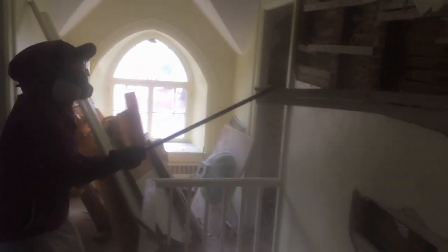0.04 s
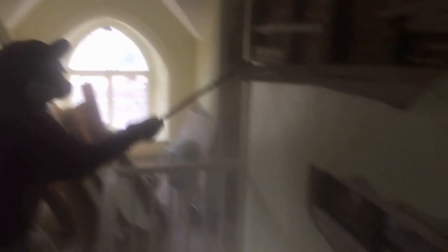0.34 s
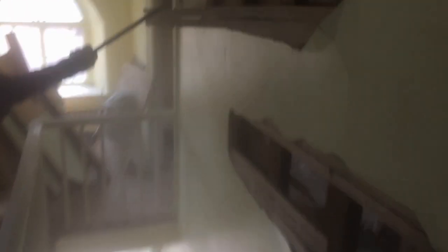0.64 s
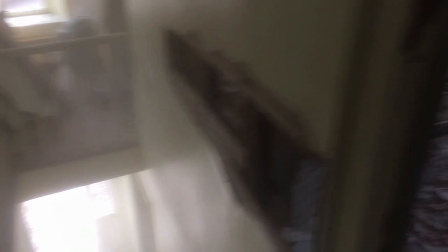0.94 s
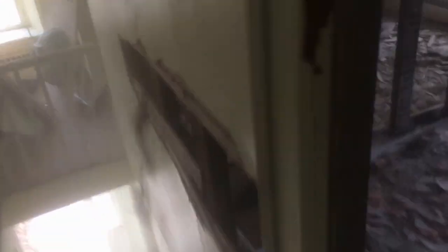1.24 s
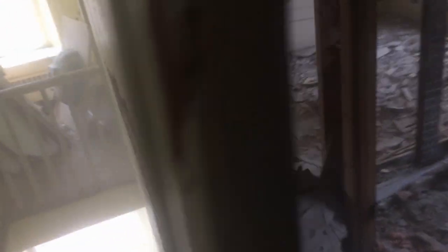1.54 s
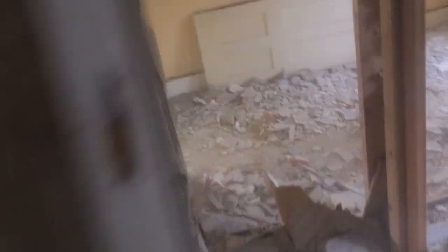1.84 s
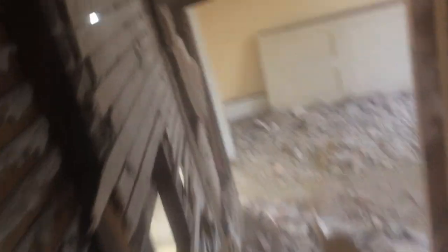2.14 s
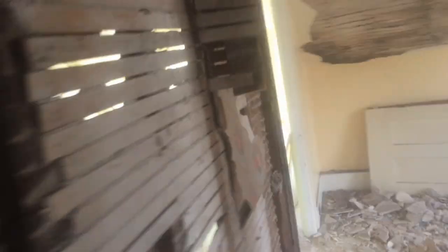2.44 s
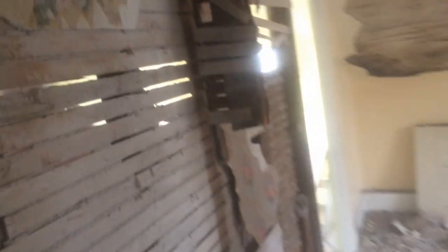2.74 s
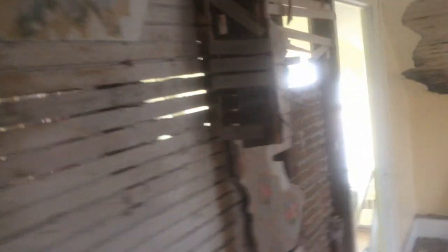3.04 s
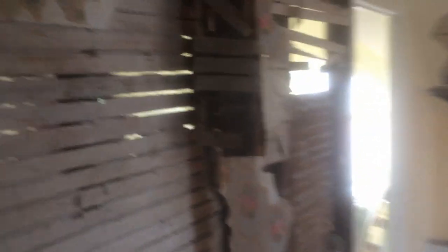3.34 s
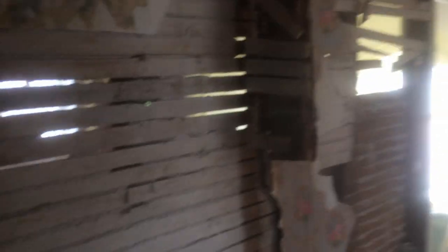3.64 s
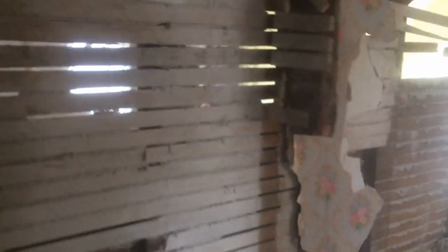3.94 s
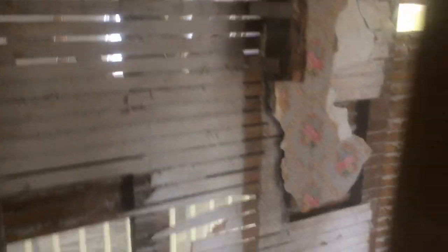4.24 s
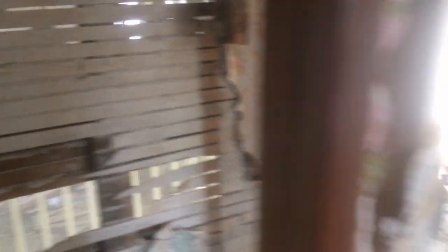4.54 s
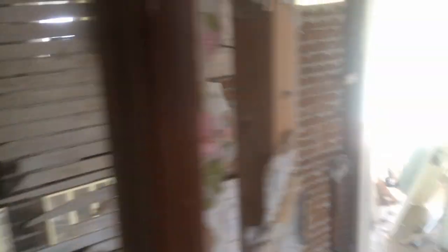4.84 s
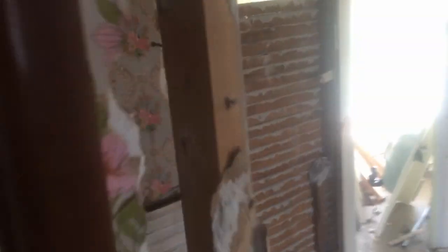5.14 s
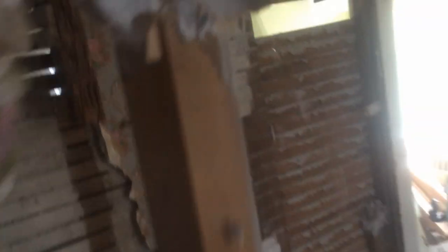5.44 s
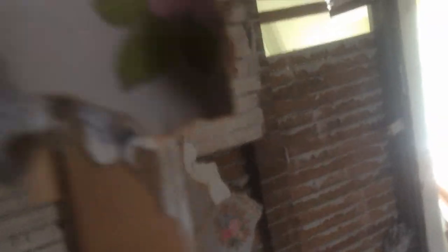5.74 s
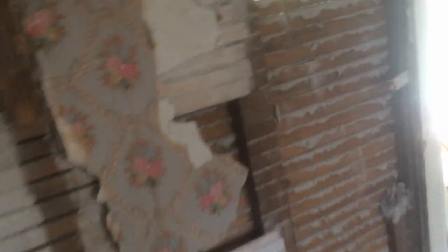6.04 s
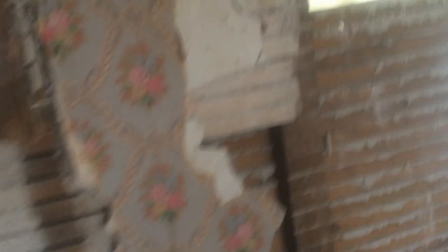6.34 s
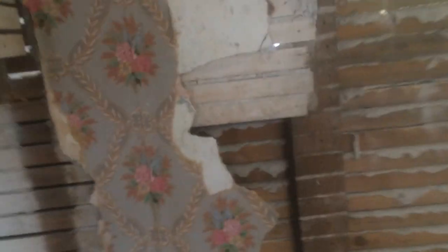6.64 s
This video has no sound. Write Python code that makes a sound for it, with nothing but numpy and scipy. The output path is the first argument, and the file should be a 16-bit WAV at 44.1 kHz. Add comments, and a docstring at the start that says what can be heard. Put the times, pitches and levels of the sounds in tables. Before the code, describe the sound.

From the start, old plaster snaps and crumbles off a wall in a dense run of cracks, with fine grit pouring close by. A steel pry bar clangs briefly, clearest at 0.4 seconds. Loose wooden strips clack and heavy pieces thud on hollow floorboards, strongly around 0.3 and 1.5 seconds. A dry lath snaps near 2 seconds, then the activity thins to boot thuds and shifting rubble. Another slab crunches with a low thump at 3.1 seconds. Small chips tick and snap nearby, wood knocks lightly, and a loose nail pings at about 3.6 seconds. A sharp crack and knock come at 4.7 seconds. From 5 to 6.3 seconds it is much quieter, with faint boot scuffs and a few chips. Around 6.6 seconds a scuff, a floor thud and more crumbling plaster close the sequence. The bare rooms ring briefly over faint low air.

```python
"""Prying off plaster and lath

Old plaster and wooden lath come off a wall in a gutted house. Slabs snap and crumble in runs of
small cracks; the steel bar, falling strips and a loose nail ring in damped modes. Boots thud on
hollow floorboards and stir the rubble. Chips tick close by; the bare rooms ring briefly."""
import sys
import numpy as np
from scipy import signal
from scipy.fft import rfft, irfft
from scipy.io import wavfile
from scipy.ndimage import uniform_filter1d

SR = 44100
rng = np.random.default_rng(int(sys.argv[2]) if len(sys.argv) > 2 else 0)


def put_to_file(sound):
    """Save the sound as 16-bit audio at rate SR, in the file named by the first command-line argument."""
    columns = np.atleast_2d(sound).T  # one column per channel
    safe = np.clip(columns, -1, 1)
    whole_steps = np.round(safe * 32767)
    wavfile.write(sys.argv[1], SR, whole_steps.astype(np.int16))


N = 298998


def from_db(db):
    return 10 ** (np.asarray(db) / 20)


def unit_rms(x):
    return x / np.sqrt(np.mean(x ** 2) + 1e-20)


def seconds(length_s):
    return np.arange(int(length_s * SR)) / SR


def decay(t, t60_s):
    return np.exp(-np.log(1000) * t / np.maximum(t60_s, 1e-3))


def at_hz(points, hz):
    """Interpolate a table over log frequency."""
    known_hz, values = np.transpose(points)
    return np.interp(np.log(np.maximum(hz, 1)), np.log(known_hz), values)


def coloured(x, spectrum):
    """Apply a gain curve; rms 1."""
    gain = from_db(at_hz(spectrum, np.fft.rfftfreq(N, 1 / SR)))
    return unit_rms(irfft(rfft(x) * gain, N))


def band(x, low_hz, high_hz, order=3):
    sos = signal.butter(order, [low_hz, high_hz], "band", fs=SR, output="sos")
    return signal.sosfilt(sos, x + 1e-18)


def add(out, start_s, sound):
    at = int(start_s * SR)
    out[at:at + len(sound)] += sound[:N - at]


def at_onset_level(level_db, sound, t60_s, onset_s):
    """Scale a decaying sound to about level_db rms over its first onset_s."""
    energy_share = 1 - decay(onset_s, t60_s) ** 2
    unit_energy = sound / (np.linalg.norm(sound) + 1e-9)
    return from_db(level_db) * unit_energy * np.sqrt(onset_s * SR / energy_share)


def grains(samples, per_s, spread_db):
    """Random clicks of either sign, sizes spread exponentially in dB."""
    birth, size, sign = rng.random((3, samples))
    size_db = spread_db * np.minimum(-np.log(1 - size), 4)
    return (birth < per_s / SR) * from_db(size_db) * np.sign(sign - .5)


def fragment(ring_s, ring_db, count=64):
    """An irregular piece: sharp contact, then damped modes, the high ones dying first."""
    t = seconds(.03)
    detune, sign = rng.random((2, count, 1)) - .5
    hz = np.geomspace(280, 14000, count)[:, None] * 2 ** (detune / 10)
    strength = np.sign(sign) * hz / np.hypot(hz, 3000)   # brief contact drives low modes weakly
    t60_s = ring_s * np.sqrt(1000 / hz)
    modes = (strength * np.sin(2 * np.pi * hz * t) * decay(t, t60_s)).sum(axis=0)
    response = from_db(ring_db) * modes / np.linalg.norm(modes)
    response[0] += 1
    return response


def struck(modes, blows, uneven_db):
    """Each blow rings the same modes at random strengths."""
    out, t = np.zeros(N), seconds(.7)
    rings = np.array([from_db(db) * np.sin(2 * np.pi * hz * t) * decay(t, t60_s)
                      for hz, db, t60_s in modes])
    for start_s, level_db in blows:
        strengths = from_db(level_db + uneven_db * rng.standard_normal(len(modes)))
        signs = rng.choice([-1, 1], len(modes))
        add(out, start_s, (strengths * signs) @ rings)
    return out


def swell_power(swells):
    """Power of brief movements that rise fast and ebb slowly."""
    t = np.arange(N) / SR
    return sum((from_db(level_db) * np.interp((t - start_s) / length_s, [0, .2, 1], [0, 1, 0])) ** 2
               for start_s, level_db, length_s in swells)


def trickle(spectrum, per_s, spread_db, ring_s, dust_db, shapes=10):
    """Pieces tumble at random over a hiss of sliding dust; rms 1."""
    pieces = np.zeros(N)
    for _ in range(shapes):
        contacts = grains(N, per_s / shapes, spread_db)
        pieces += signal.oaconvolve(contacts, fragment(ring_s, ring_db=4))[:N]
    dust = from_db(dust_db) * rng.standard_normal(N)
    return coloured(unit_rms(pieces) + dust, spectrum)


# background spectrum: freq_hz, gain_db
AIR_SPECTRUM = [(20, -19.5), (50, 0.5), (180, -10.5), (400, -13), (1000, -16.5), (4000, -21.5),
                (16000, -32.5)]


def room_air():
    """Faint, steady, bass-heavy noise."""
    return coloured(rng.standard_normal(N), AIR_SPECTRUM)


# loose rubble on the move: time_s, level_db
SETTLING = [(0.0, -28), (0.32, -30), (0.51, -32.5), (0.7, -34), (0.91, -29), (1.4, -36), (1.64, -28),
            (2.02, -42), (2.45, -40), (2.62, -49), (3.87, -48), (3.98, -40.5), (4.63, -43.5), (4.87, -54.5),
            (5.38, -65.5), (5.65, -59.5), (6.34, -65.5), (6.78, -35)]
# shuffling boots: start_s, level_db, length_s
BOOT_SCUFFS = [(2.429, -36.5, .24), (4.08, -37, 0.2), (4.372, -40.5, 0.18), (5.074, -44.5, 0.42),
               (5.317, -44, 0.35), (6.321, -42, 0.17), (6.553, -33, 0.36)]


def rubble_motion_db(scuff_boost_db=0, usual_db=-40):
    """Slow settling plus a swell per boot scuff, relative to the usual motion."""
    settling_db = np.interp(np.arange(N) / SR, *np.transpose(SETTLING))
    power = from_db(settling_db) ** 2 + from_db(scuff_boost_db) ** 2 * swell_power(BOOT_SCUFFS)
    return 10 * np.log10(power) - usual_db


# spectra of coarse lumps, fine grit and floor rumble: freq_hz, gain_db
LUMP_SPECTRUM = [(120, -21), (400, -4.5), (800, 2.5), (1500, -3), (2800, -4), (4500, -10.5), (8000, -12),
                 (16000, -48.5)]
GRIT_SPECTRUM = [(1500, -31), (3500, -7.5), (5500, -0.5), (8000, -9), (11000, -8), (16000, -18.5)]
RUMBLE_SPECTRUM = [(20, -44.5), (40, -12), (65, 0.5), (100, -4), (170, 8.5), (250, 2), (350, 2), (500, 1),
                   (1000, -27.5)]
# fine plaster pouring close by: start_s, level_db, length_s
PLASTER_SHOWERS = [(.09, -34.5, 0.15), (.3, -32, 0.15), (.97, -37, 0.19), (1.5, -46, 0.19),
                   (1.7, -43, 0.078), (4.58, -43.5, 0.083), (5.07, -47, 0.24), (5.39, -46, .09)]


def shifting_rubble(surge_db=2.5, surge_s=.027):
    """One motion tumbles lumps, trickles grit and rumbles the floor; showers add more grit."""
    width = int(surge_s * SR)
    surges = unit_rms(uniform_filter1d(uniform_filter1d(rng.standard_normal(N), width), width))
    motion_db = rubble_motion_db() + surge_db * surges
    lumps = trickle(LUMP_SPECTRUM, per_s=500, spread_db=.5, ring_s=.085, dust_db=-7)
    grit = trickle(GRIT_SPECTRUM, per_s=370, spread_db=3, ring_s=.009, dust_db=0)
    grit_db = -56 + .72 * rubble_motion_db(scuff_boost_db=2)   # boots crush extra grit
    grit_gain = np.sqrt(from_db(grit_db) ** 2 + swell_power(PLASTER_SHOWERS))
    rumble = coloured(rng.standard_normal(N), RUMBLE_SPECTRUM)
    return from_db(-44 + motion_db) * lumps + grit_gain * grit + from_db(-45.5 + .9 * motion_db) * rumble


# body, knock, crack and grit bands: low_hz, high_hz
FRACTURE_BANDS = [(250, 650), (650, 1500), (1500, 4200), (4200, 13000)]


def band_levels_db(level_db, register_oct, focus_db_per_oct):
    """A piece is loudest in the band nearest its register, counted up from the knock band."""
    centres_oct = np.log2(FRACTURE_BANDS).mean(axis=1)
    distance_oct = np.abs(centres_oct - centres_oct[1] - register_oct)
    return level_db - focus_db_per_oct * (distance_oct - distance_oct.min())


def fractures(pieces, cracks_per_s, spread_db, snap_db, ring_s, ring_db, dull_hz, linger=1, splinters=3):
    """Each piece gives way with one snap and a dying run of cracks shared among its splinters."""
    out, t = np.zeros(N), seconds(.25)
    pole = np.exp(-2 * np.pi * dull_hz / SR)   # soft material dulls each contact
    for start_s, level_db, register_oct, focus_db_per_oct, crumble_s in pieces:
        t60_s = linger * crumble_s
        runs = np.array([grains(len(t), cracks_per_s / splinters, spread_db) for _ in range(splinters)])
        runs *= decay(t, t60_s)
        runs /= np.linalg.norm(runs) + 1e-9
        runs[0, 0] += from_db(snap_db) * decay(crumble_s, .98)   # slower crumbling, weaker snap
        cracks = sum(signal.fftconvolve(run, fragment(ring_s, ring_db))[:len(t)] for run in runs)
        dulled = signal.lfilter([1], [1, -pole], cracks)
        levels_db = band_levels_db(level_db, register_oct, focus_db_per_oct)
        for band_db, edges_hz in zip(levels_db, FRACTURE_BANDS):
            add(out, start_s, at_onset_level(band_db, band(dulled, *edges_hz), t60_s, onset_s=.02))
    return out


# plaster and lath breaking or landing: start_s, level_db, register_oct, focus_db_per_oct, crumble_s
WALL_BREAKS = [(.017, -20.5, 1.1, 5, 0.076), (.095, -17, -0.27, 5, 0.055), (.14, -27.5, 1.4, 18, 0.038),
               (.19, -21, 0.073, 5.5, 0.32), (.228, -22, 0.09, 4.5, 0.069), (.294, -19.5, .1, 4, 0.1),
               (.301, -23, 2, 12, 0.016), (.322, -25, -0.25, 4.5, 0.48), (.401, -25, 0.55, 9, 0.032),
               (.418, -15.5, 1.89, 28, 0.043), (.434, -20, 1.73, 14, 0.15), (.673, -28.5, 0.83, 10.5, 0.14),
               (.722, -18, 1.09, 9, 0.13), (.755, -23.5, 0.84, 18, 0.14), (.832, -23.5, 0.55, 6, .079),
               (.851, -29.5, 1.1, 11, 0.055), (.911, -17, 1.77, 13.5, 0.066), (.964, -23, 1.62, 6, 0.13),
               (.995, -25, 1.5, 10.5, 0.26), (1.112, -20.5, 1.02, 6.5, 0.06), (1.15, -25.5, 0.74, 10, 0.04),
               (1.207, -15, -0.82, 9.5, 0.032), (1.283, -36.5, -2, 0.5, 0.049),
               (1.421, -23.5, 0.36, 7.5, 0.064), (1.452, -15, -1.5, 16, 0.077),
               (1.468, -18, -1.42, 4, 0.13), (1.471, -23, 1.58, 13, 0.093), (1.538, -19, 0.93, 8, 0.085),
               (1.568, -22.5, -0.86, 5.5, 0.12), (1.654, -28, -0.85, 4.5, 0.015),
               (1.733, -28.5, 1.67, 11, 0.18), (1.75, -27, -1.5, 12, 0.047), (1.78, -36.5, 0, 0.5, 0.059),
               (1.96, -27, 0.87, 11, 0.066), (2.096, -29, -1, 6.5, 0.016), (2.126, -30, 0.98, 22, 0.075),
               (2.208, -36, 1.4, 19, 0.032), (2.296, -33.5, 1.4, 4.5, 0.093), (2.52, -34, -0.5, 9, 0.22),
               (2.803, -42.5, 0.41, 17, 0.061), (2.88, -45.5, 0.82, 21, 0.19),
               (3.085, -19, 0.49, 7.5, 0.034), (3.094, -21.5, 1.35, 2.5, 0.18),
               (3.112, -19, -0.54, 3, 0.064), (4.018, -34.5, -0.13, 0.5, 0.079), (4.12, -38, 1.4, 7, 0.57),
               (4.485, -34.5, 1.95, 22, .2), (4.689, -19.5, 0.53, 7, 0.011), (4.703, -26, 1.8, 7, 0.11),
               (5.138, -46, 1.5, 5, 0.097), (5.228, -39, 0.51, 6, 0.069), (5.252, -39, 1.6, 13, .053),
               (6.335, -39.5, -0.77, 10.5, 0.09), (6.365, -46, .8, 6, 0.3),
               (6.595, -31.5, 1.45, 3.5, 0.092), (6.626, -33, -1.4, 9, 0.039),
               (6.669, -27, 1.85, 3.5, 0.19)]


def breaking_wall():
    """Plaster crunches broadly (low focus); wood cracks in a narrow range (high focus)."""
    return fractures(WALL_BREAKS, cracks_per_s=2400, spread_db=3, snap_db=-3,
                     ring_s=.048, ring_db=6.5, dull_hz=1620, linger=1.4)


# steel bar modes: freq_hz, level_db, t60_s
PRY_BAR_MODES = [(1820, -12.5, 0.22), (2120, -5.5, .22), (2550, -2.5, 0.35), (2780, -4, 0.28),
                 (3006, -4.5, 0.12), (3160, 0, .2), (3095, -2, 0.35), (3505, -2.5, 0.15), (3420, -4.5, .3),
                 (3975, -3, .24), (4070, -7, 0.14), (4220, 0.5, 0.24), (6100, -10.5, 0.28),
                 (7935, -15.5, .2)]
# blows on the bar: start_s, level_db
PRY_BAR_BLOWS = [(.018, -35), (0.421, -27.5), (.724, -40)]


def pry_bar():
    """Struck steel clangs in a cluster of high modes."""
    return struck(PRY_BAR_MODES, PRY_BAR_BLOWS, uneven_db=1.5)


# loose wood knocking: start_s, level_db, pitch_hz
WOOD_CLACKS = [(0.019, -13, 3120), (0.096, -14, 1100), (1.208, -13.5, 782), (1.209, -24, 1130),
               (1.451, -14, 344), (1.468, -10.5, 592), (1.539, -21, 2000), (1.593, -14, 1096),
               (1.889, -24, 657), (2.018, -26, 1845), (3.474, -22.5, 2740), (3.549, -28, 980),
               (3.788, -27.5, 550), (3.954, -24.5, 920), (4.066, -25.5, 920), (4.69, -21.5, 742),
               (5.252, -30, 3050), (6.627, -20.5, 360)]


def clacking_strips():
    """A loose strip sounds one bending mode; the higher, the sooner it dies."""
    out, t = np.zeros(N), seconds(.2)
    for start_s, level_db, pitch_hz in WOOD_CLACKS:
        t60_s = .048 * (1000 / pitch_hz) ** .22
        add(out, start_s, from_db(level_db) * np.sin(2 * np.pi * pitch_hz * t) * decay(t, t60_s))
    return out


# steps and heavy pieces on the floor: start_s, boards_db, pitch_hz, joists_db
FLOOR_THUDS = [(0.065, -26.5, 305, -39.5), (0.092, -25.5, 297, -54), (.298, -14.5, 202, -29),
               (0.322, -37, 211, -37), (.371, -24.5, 223, -38), (0.494, -26.5, 270, -44),
               (.718, -21, 231, -58), (0.767, -31.5, 228, -48), (.835, -21.5, 207, -47),
               (.925, -23, 242, -55), (1.112, -27.5, 282, -67), (1.206, -25.5, 316, -60),
               (1.448, -14, 277, -33), (1.491, -31, 243, -30), (1.591, -24, 175, -57),
               (1.654, -25, 180, -45), (1.747, -26.5, 230, -36.5), (1.888, -17, 189.6, -51),
               (2.093, -28.5, 264, -53), (2.152, -32, 212, -46), (2.299, -33.5, 189, -41),
               (2.379, -34, 197, -56), (2.509, -24, 206, -51), (2.549, -29.5, 188, -36.5),
               (2.807, -42.5, 180, -48), (3.104, -21, 168, -28.5), (3.181, -43, 176, -37),
               (4.016, -29.5, 236, -62), (4.033, -38, 205, -66.5), (4.69, -36, 231, -38.5),
               (4.925, -53, 235, -55.5), (5.083, -48, 203, -72), (6.622, -25, 265.7, -32.5),
               (6.677, -33, 192, -44), (6.755, -33, 205, -45)]


def floorboards(board_t60_s=.1, joist_t60_s=.24, punch_t60_s=.056, spread_oct=.55, count=9):
    """A soft blow punches one board and rings modes round its pitch; the joists boom below."""
    out, t = np.zeros(N), seconds(.35)
    attack = 1 - decay(t, .018)
    for start_s, boards_db, pitch_hz, joists_db in FLOOR_THUDS:
        detune = rng.random((count, 1)) - .5
        sign = rng.choice([-1, 1], (count, 1))
        offset_oct = spread_oct * (np.linspace(-1, 1, count)[:, None] + 2 * detune / count)
        modes = (sign * np.sin(2 * np.pi * pitch_hz * 2 ** offset_oct * t)).sum(axis=0)
        punch = unit_rms(np.sin(2 * np.pi * pitch_hz * t) * decay(t, punch_t60_s))
        boards = unit_rms(modes * attack * decay(t, board_t60_s)) + from_db(-4) * punch
        joists = band(rng.standard_normal(len(t)) * decay(t, joist_t60_s), 61, 110)
        add(out, start_s, at_onset_level(boards_db, boards, board_t60_s, onset_s=.04))
        add(out, start_s, at_onset_level(joists_db, joists, joist_t60_s, onset_s=.04))
    return out


# hard grains hitting close by: start_s, level_db, t60_s
GRAIN_TICKS = [(.302, -26, .012), (.911, -24, .015), (1.053, -7.5, 0.024), (1.709, -2.5, 0.024),
               (2.297, -33, .02), (3.094, -15, .016), (3.207, -12, 0.081), (3.349, -25, .012),
               (3.432, -35, .014), (3.474, -29, .011), (3.745, -8, 0.0095), (3.886, -9, 0.011),
               (3.937, -29, .008), (4.005, -9, .02), (4.27, -6, 0.051), (4.616, -8, 0.024),
               (4.629, -10.5, 0.08), (4.689, 1, 0.046), (5.139, -17, .016), (6.67, -22, .03)]


def ticking_grains(fizz_db=-12.5):
    """A hard grain gives one bright click and shatters in a brief fizz."""
    out, t = np.zeros(N), seconds(.08)
    for start_s, level_db, t60_s in GRAIN_TICKS:
        tick = from_db(fizz_db) * rng.standard_normal(len(t)) * decay(t, t60_s)
        tick[0] = 1
        add(out, start_s, from_db(level_db) * tick)
    return band(out, 4500, 14000, order=1)


# chips snapping close by: start_s, level_db, register_oct, focus_db_per_oct, crumble_s
CHIP_SNAPS = [(.544, -31.5, 1.7, 4.5, 0.043), (1.051, -25.5, 1.9, 12, 0.019), (1.592, -21, -0.04, 7, 0.016),
              (1.915, -28, -1.5, 2, 0.037), (3.328, -40.5, 0, 5, 0.012), (3.351, -33, 0.24, 4, .025),
              (3.432, -40.5, .3, 1.5, 0.05), (3.474, -32, 1.4, 4, 0.022), (3.548, -30.5, 0.7, 5, 0.023),
              (3.601, -38, 1, 1.5, 0.18), (3.745, -33.5, 0.5, 4, 0.058), (3.784, -25, 0.8, 7.5, 0.013),
              (3.793, -31, 0.1, 4.5, 0.075), (3.855, -37, 1.8, 8, 0.047), (3.903, -38, 1.5, 4, 0.031),
              (3.937, -37.5, 2.4, 14, 0.019), (3.951, -38, 1.5, 5.5, 0.0066), (4.005, -32, 1.6, 2.5, 0.076),
              (4.066, -31.5, 0, 5, 0.038), (4.199, -36.5, 1.4, 10, 0.0079), (4.435, -42, 2, 23, 0.054),
              (5.05, -53.5, 2, 3.5, .015), (5.877, -60.5, 2.4, 1, .01), (6.014, -48, 0.44, 21, 0.026),
              (6.088, -60.5, 1.8, 10, .009)]


def snapping_chips():
    """Small pieces break with sparser, brighter, shorter cracks than the wall."""
    return fractures(CHIP_SNAPS, cracks_per_s=1300, spread_db=-1, snap_db=-8.5,
                     ring_s=.016, ring_db=7, dull_hz=2165)


# dry lath modes: freq_hz, level_db, t60_s
DRY_LATH_MODES = [(1710, -13, 0.19), (2210, -3.5, 0.11), (2563, 7.5, 0.045), (3000, 8, 0.009),
                  (4560, 2, 0.012)]
# lath snaps: start_s, level_db
LATH_SNAPS = [(1.960, -18.5), (3.785, -29)]


def snapping_lath():
    """A dry strip rings briefly as it snaps."""
    return struck(DRY_LATH_MODES, LATH_SNAPS, uneven_db=1)


# nail modes: freq_hz, level_db, t60_s
LOOSE_NAIL_MODES = [(3510, -1, 0.042), (3270, -21, 0.18), (5970, -10, 0.049)]
# nail landing: start_s, level_db
NAIL_LANDING = [(3.649, -26.5)]


def falling_nail():
    """A loose nail pings once on landing."""
    return struck(LOOSE_NAIL_MODES, NAIL_LANDING, uneven_db=3)


# decay of the bare rooms: freq_hz, t60_s
ROOM_DECAY = [(100, 0.4), (400, 0.26), (1200, 0.21), (3000, 0.21), (7000, 0.19), (15000, 0.14)]


def room_echo(x, build_s=.057):
    """Bare walls return a diffuse tail, the treble dying first."""
    t, edges_hz = seconds(.8), np.geomspace(50, 18000, 10)
    tail = np.zeros(len(t))
    for low_hz, high_hz in zip(edges_hz, edges_hz[1:]):
        t60_s = at_hz(ROOM_DECAY, np.sqrt(low_hz * high_hz))
        tail += band(rng.standard_normal(len(t)), low_hz, high_hz) * decay(t, t60_s)
    tail *= 1 - decay(t, build_s)
    return signal.fftconvolve(x, tail / np.linalg.norm(tail))[:N]


def scene():
    """Mono mix; breaks and impacts feed the echo, rubble and air stay dry."""
    wall = from_db(-.5) * breaking_wall()
    chips = from_db(-1.5) * snapping_chips() + from_db(-8) * ticking_grains()
    thuds = from_db(-2.3) * floorboards()
    metal = from_db(-3.5) * pry_bar() + falling_nail()
    wood = snapping_lath() + from_db(3) * clacking_strips()
    echo = room_echo(from_db(-10.5) * wall + from_db(-10) * chips
                     + from_db(-9.5) * thuds + from_db(-16) * (metal + wood))
    air = from_db(-64.5) * room_air()
    return (wall + chips + thuds + metal + wood + shifting_rubble() + echo + air)[None]


def record(dry, low_cut_hz=36, high_cut_hz=16200, ceiling=.9):
    """A small microphone loses the deepest bass; peaks are rounded and the top is cut."""
    thinned = signal.sosfilt(signal.butter(2, low_cut_hz, "high", fs=SR, output="sos"), dry)
    rounded = ceiling * np.tanh(thinned / ceiling)
    return signal.sosfilt(signal.ellip(10, .2, 80, high_cut_hz, fs=SR, output="sos"), rounded)


dry = scene()
out = record(dry)
put_to_file(out)
```